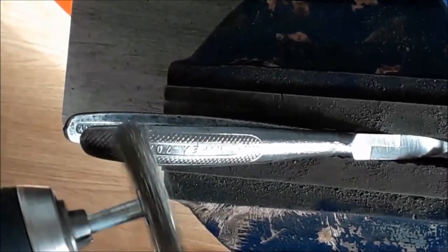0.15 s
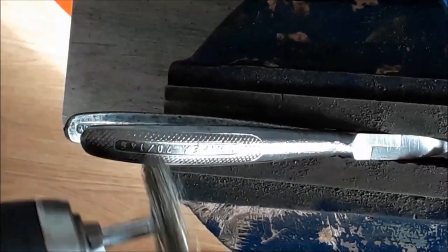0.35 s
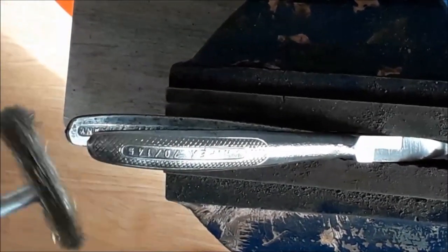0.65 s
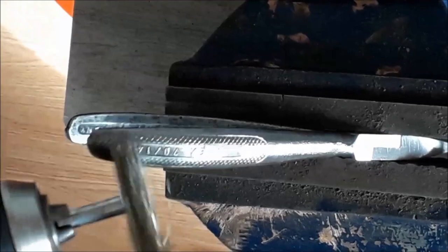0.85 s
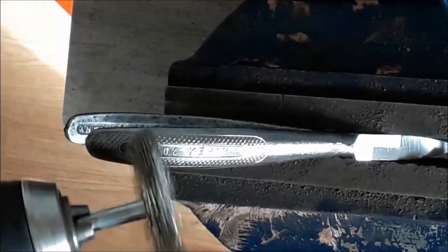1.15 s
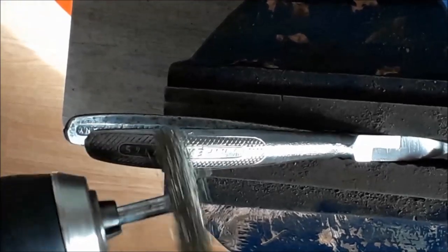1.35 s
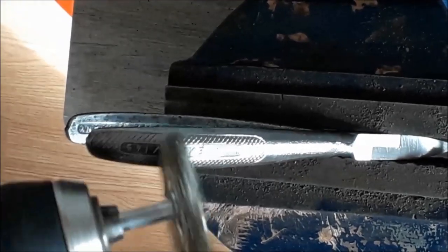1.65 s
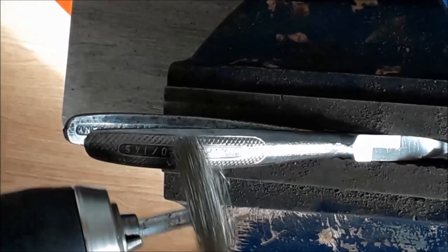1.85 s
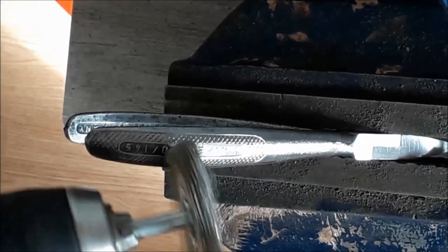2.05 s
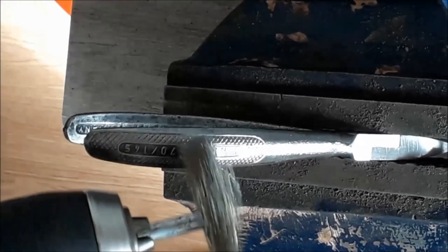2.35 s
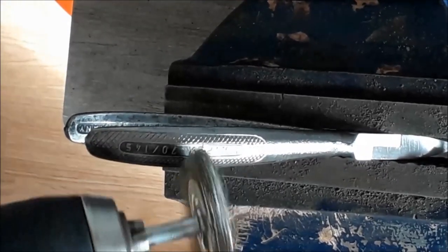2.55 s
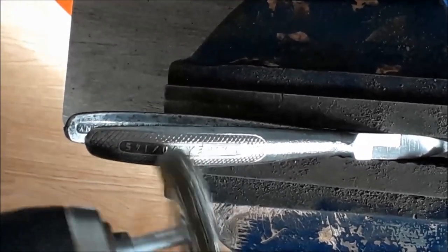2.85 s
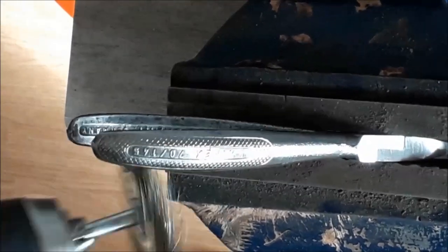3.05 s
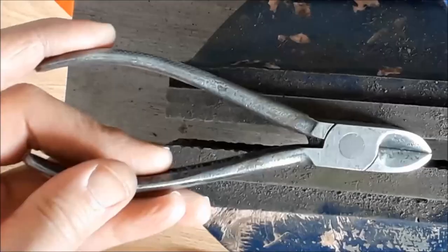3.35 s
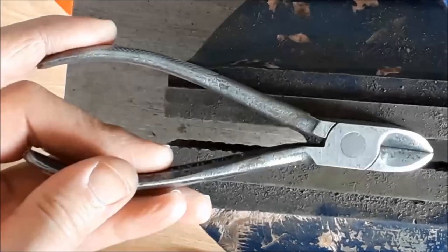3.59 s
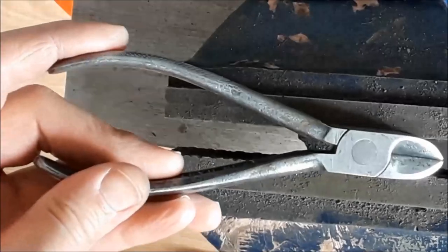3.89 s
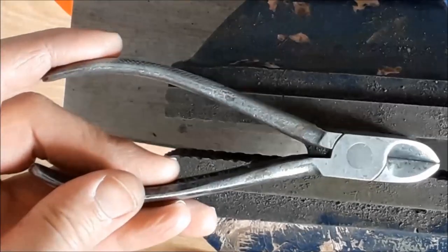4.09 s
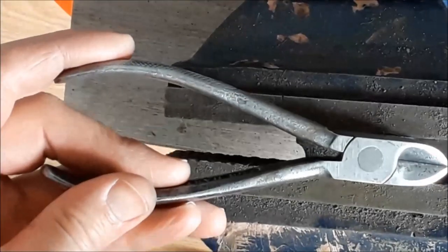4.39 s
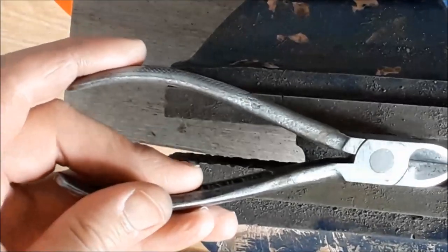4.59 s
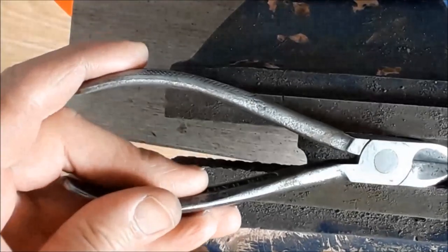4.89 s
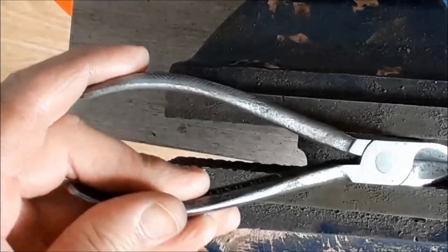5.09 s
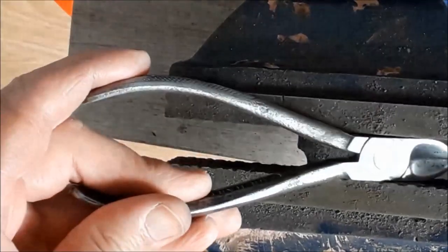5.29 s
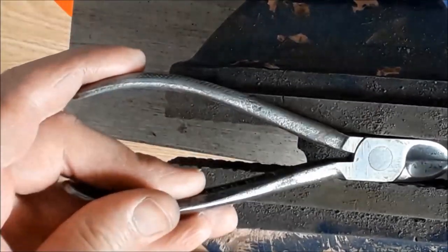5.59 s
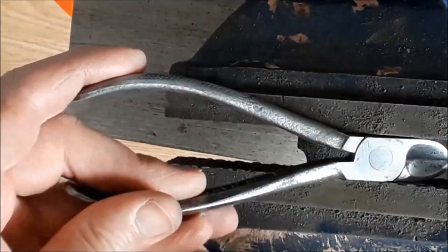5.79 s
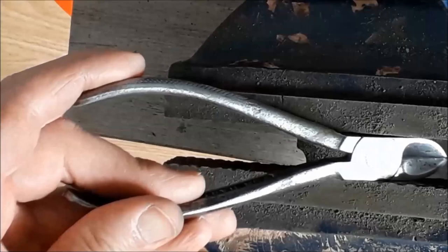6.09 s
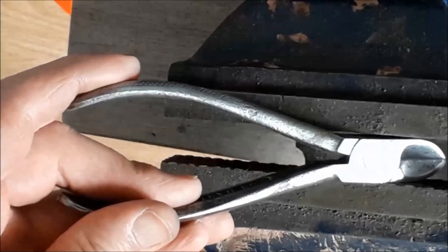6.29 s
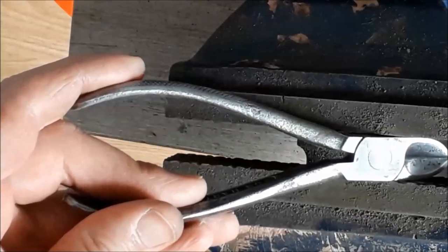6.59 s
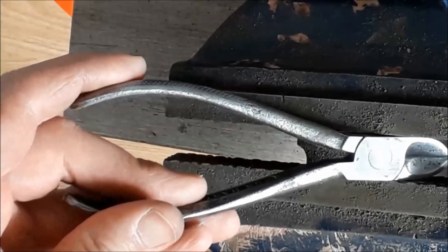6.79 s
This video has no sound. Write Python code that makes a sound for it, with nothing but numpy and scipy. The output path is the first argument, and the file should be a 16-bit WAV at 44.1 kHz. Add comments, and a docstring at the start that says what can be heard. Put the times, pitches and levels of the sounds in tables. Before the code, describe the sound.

Close drill whine and hissing wire bristles on steel stop abruptly, followed by wooden knocks and metal clacks across a workshop.

```python
"""A drill whines close to the microphone, spinning a wire wheel against pliers clamped in a workshop vice.
The motor sags once per turn of the lopsided wheel, its fan sings, and the bristles hiss and drum on the
handles. The drill's sound cuts off abruptly. Fingers then slide over the pliers and the joint ticks,
while wooden knocks, metal clacks and a heavy thud carry from across the room."""
import sys
import numpy as np
from scipy import signal
from scipy.fft import rfft, irfft, next_fast_len
from scipy.io import wavfile
from scipy.ndimage import map_coordinates

SR = 44100
rng = np.random.default_rng(int(sys.argv[2]) if len(sys.argv) > 2 else 0)


def inscribe(sig):
    """Save sig as 16-bit PCM at rate SR to the path in sys.argv[1].

    A 1-D sig is mono; a 2-D sig holds one channel per row.
    Samples are clipped to [-1, 1] before scaling.
    """
    pcm = np.round(np.clip(np.atleast_2d(sig).T, -1, 1) * 32767)
    wavfile.write(sys.argv[1], SR, pcm.astype(np.int16))


N = 306054

# Levels in the tables are relative.
# spectra of the room tone, the microphone's own hiss and skin on steel: f/Hz, level/dB
ROOM_TONE_SPECTRUM = [(25, -29), (60, -14.5), (130, -5.5), (200, -4.5), (500, -6.5), (800, -8.5),
                      (1200, -13.5), (1650, -11), (2500, -25), (4000, -32.5), (8000, -62.5)]
MIC_SPECTRUM = [(1000, -6.5), (4000, -12), (9500, -7.5), (11800, 2.5), (13500, -12.5), (15800, -8)]
SKIN_SPECTRUM = [(1180, -32), (2000, -6), (3060, -7), (4630, -6), (5690, -6), (9570, -8), (11900, -4.5),
                 (15800, -22.5)]
# the workshop's reverberation: f/Hz, t60/s
ROOM_DECAY = [(100, 0.35), (260, 0.15), (700, 0.29), (1800, 0.26), (5000, 0.24), (13000, 0.2)]
# fingers sliding on the pliers, close up: t/s, level/dB
FINGER_SLIDES = [(3.45, -51.5), (3.85, -57.5), (4.15, -53.5), (4.3, -55.5), (4.48, -68.5), (4.72, -62.5),
                 (5.25, -74.5), (5.6, -63), (5.9, -75), (6.17, -64.5), (6.45, -88.5), (6.65, -64.5),
                 (6.9, -87.5)]
# ticks of the pliers' joint: t/s, level/dB
JOINT_TICKS = [(3.87, -34), (4.73, -48)]
# ring of the joint: f/Hz, level/dB, t60/s
JOINT_MODES = [(6250, -2, 0.049), (11950, -12, 0.033), (14950, -14.5, .03)]
# metal clacks across the room: t/s, level/dB, added treble/dB
METAL_CLACKS = [(4.578, -54, 1), (5.253, -27, -2), (5.285, -26, -6), (5.309, -49, -14), (5.485, -40, 7.5),
                (5.504, -41.5, 13), (5.528, -24.5, 10.5)]
# knocks across the room: t/s, level/dB, boom/dB, crack/dB, lead of the first touch/s
WOOD_KNOCKS = [(3.561, -53.5, -3, 9, 0.0049), (3.724, -34.5, 17.5, -31, 0.012),
               (3.76, -30.5, 7.5, -17, 0.0087), (3.834, -32.5, 2, -10, 0.0054),
               (3.955, -15.5, -8.5, -20, 0.0079), (4.207, -48, -5, 6, 0.011), (4.352, -18, 4, 1.5, 0.0074),
               (4.662, -31, -17, -5.5, 0.01), (4.862, -39.5, 17.5, -11, 0), (5.699, -44.5, 3, -32, 0.0033),
               (5.951, -43, 2, -14, 0.0055), (6.243, -16, 0.5, -7.5, 0.012), (6.6, -35.5, 2, -29, 0.0093),
               (6.618, -30, -3, -34, 0.0014)]
# spectra of a clack, the thud and a knock: f/Hz, level/dB
CLACK_SPECTRUM = [(70, -31), (150, -5), (330, 2), (1000, -3), (2000, 0), (3200, -7), (6000, -6),
                  (9000, -13.5), (12000, -14.5), (13500, -26), (15800, -23)]
THUD_SPECTRUM = [(30, -25), (60, -31), (88, 1.5), (115, -6.5), (160, -1.5), (270, -6.5), (450, -1.5),
                 (750, -7.5), (1230, -5.5), (2060, -10.5), (3500, -13.5), (7000, -18.5), (11800, -29),
                 (15800, -42)]
KNOCK_SPECTRUM = [(53, -55), (90, -25), (145, -27), (218, 0.5), (400, -11.5), (497, -3.5), (566, -15.5),
                  (992, -12), (1230, -11.5), (1530, -9), (2110, -12), (4130, -27.5), (7100, -31),
                  (15800, -44)]
# resonances of struck metal, boards, wood and the clamped handles: f/Hz, width/Hz, level/dB
METAL_MODES = [(1017, 17, 3.5), (2210, 46, -14), (3180, 110, -5), (5000, 42, -10), (6060, 83, -11),
               (8240, 28, -6), (9000, 88, -5), (10700, 76, -15), (11700, 170, -9)]
BOARD_MODES = [(195, 140, 3.5), (437, 51, -12), (650, 23, 1), (810, 64, 4.5), (1310, 25, -11),
               (1560, 26, 1.5), (1900, 140, -7), (2310, 46, -3)]
WOOD_MODES = [(234, 210, -2), (490, 12, -3), (687, 64, 2.5), (1007, 18, 6.5), (1580, 84, 3),
              (2050, 110, -1.5), (3110, 110, -5.5)]
HANDLE_MODES = [(143, 42, -20.5), (213.8, 12, -2.5), (314, 36, -10.5), (347.7, 20, -18.5), (507, 10, -4),
                (545.8, 20, -6.5), (606.6, 16, -6.5), (855, 99, -21), (1020, 86, -12), (1104, 50, -16.5)]
# the fan's octave sings out as the pressure eases: t/s, half length/s, boost/dB
OCTAVE_SWELLS = [(0.475, 0.036, 9.5), (3.084, 0.095, 6), (3.365, 0.037, 10)]
# rush of bristles, fan and gears: f/Hz, level/dB
HISS_SPECTRUM = [(200, -36.5), (600, -16.5), (1400, -17.5), (2000, -6), (2600, -11.5), (3150, -1),
                 (4150, -8), (5300, 2.5), (6100, -2), (7200, 2), (9200, 0), (12150, 2.5), (12900, -4),
                 (15800, -5.5)]
# how hard the wheel bears on the handles, slipping off at 0.7 s and lifting at 3.2 s: t/s, drumming/dB
WHEEL_CONTACT = [(0, -30), (0.45, -29), (0.62, -33), (0.69, -54.5), (0.82, -59.5), (0.85, -33), (1.2, -29),
                 (1.33, -27.5), (1.8, -31), (2.9, -31.5), (3.08, -28.5), (3.21, -26), (3.28, -46.5),
                 (3.41, -57)]
# motor shaft speed before the wheel's drag: t/s, speed/Hz
MOTOR_SPEED = [(0, 455.3), (0.1, 453.9), (0.38, 452.5), (0.5, 457.1), (0.6, 460.7), (0.83, 460.2),
               (0.97, 454.4), (1.25, 455.2), (1.42, 453.4), (1.8, 454.0), (2.25, 453.4), (2.7, 454.7),
               (3.0, 456.7), (3.17, 460.8), (3.41, 460.6)]
# motor whine: shaft multiple (rounded when played), level under load/dB, level running free/dB
WHINE_HARMONICS = [(1, -51.5, -56), (3, -63, -48.5), (4, -43, -40), (5, -41, -57), (6, -38.5, -48),
                   (7, -40.5, -57.5), (9, -36.5, -51.5), (11, -40.5, -42), (15, -35, -31), (16, -43, -38),
                   (17, -38, -49.5), (18, -47.5, -35.5), (19.06, -23.5, -35.5), (22, -23.5, -32.5),
                   (23.1, -41.5, -30), (24, -37.5, -39), (25, -42, -35.5), (26, -24, -32), (27, -27, -37),
                   (28, -34.5, -39), (29, -31.5, -41.5), (30, -29.5, -31), (32, -35, -33.5),
                   (34, -46, -34.5)]

CUTOFF_S = 3.413  # the drill's sound cuts off
IDLE_HZ, LOADED_HZ = 461, 454  # shaft speed running free and under full load
WHEEL_RATIO, PINION_RATIO = 58.76, 5  # motor turns for one turn of each
FAN_BLADES = 10
THUD_S, SETTLE_S = 4.911, 0.009  # the heavy landing; gap between the touches ahead of it


def amp(db):
    """Decibels to gain."""
    return 10 ** (np.asarray(db) / 20)


def unit(x):
    """Scale to rms 1."""
    return x / np.sqrt(np.mean(x ** 2) + 1e-20)


def along(points, hz):
    """Interpolate (Hz, value) points on a log frequency axis."""
    f, values = np.transpose(points)
    return np.interp(np.log(hz + 1), np.log(f + 1), values)


def curve(points):
    """Interpolate (s, value) points to one value per sample."""
    return np.interp(np.arange(N) / SR, *np.transpose(points))


def wobble(rate):
    """A smooth random curve, rate knots a second."""
    knots = rng.standard_normal(int(N * rate / SR) + 4)
    coarse = np.arange(0, N, 16)
    return np.interp(np.arange(N), coarse, map_coordinates(knots, [coarse * rate / SR]))


def filtered(x, order, hz, kind):
    """x through a Butterworth filter."""
    return signal.sosfilt(signal.butter(order, hz, kind, fs=SR, output="sos"), x)


def coloured(x, gain):
    """x through the causal filter with this gain over frequency, keeping the power of white noise."""
    size = 8192
    magnitude = np.maximum(unit(gain(np.fft.rfftfreq(size, 1 / SR))), 1e-6)
    cepstrum = irfft(np.log(magnitude))[:size // 2]
    cepstrum[1:] *= 2  # minimum phase
    impulse = irfft(np.exp(rfft(cepstrum, size)))
    return signal.fftconvolve(x, impulse)[:len(x)]


def shaped(x, spectrum):
    """x coloured by (Hz, dB) points."""
    return coloured(x, lambda hz: amp(along(spectrum, hz)))


def resonances(modes, hz):
    """Gain of a body with (Hz, width, dB) modes."""
    return np.sqrt(sum(amp(db) ** 2 / (1 + (2 * (hz - f) / width) ** 2) for f, width, db in modes))


def struck_body(x, spectrum, modes, dead):
    """Contact noise x sounding through a body; dead weights the part that misses its resonances."""
    return coloured(x, lambda hz: amp(along(spectrum, hz)) * (dead + resonances(modes, hz)))


def add(track, s, x):
    """Mix x into track from time s."""
    part = track[round(s * SR):][:len(x)]
    part += x[:len(part)]


def background():
    """Microphone hiss, skin swishing over steel, and a low room tone that swells as the hand moves."""
    skin_db = curve(FINGER_SLIDES)
    murmur_db = -59.5 + 0.32 * (skin_db - skin_db[round(CUTOFF_S * SR):].mean())
    murmur = amp(murmur_db + 1.5 * wobble(14)) * shaped(rng.standard_normal(N), ROOM_TONE_SPECTRUM)
    skin = amp(skin_db + 1.4 * wobble(28)) * shaped(rng.standard_normal(N), SKIN_SPECTRUM)
    mic_hiss = amp(-71) * shaped(rng.standard_normal(N), MIC_SPECTRUM)
    return murmur + skin + mic_hiss


def joint_ticks():
    """Close up, the steel joint of the pliers clicks and rings briefly."""
    out, t = np.zeros(N), np.arange(SR // 8) / SR
    attack = 1 - np.exp(-t / 0.0011)
    ring = sum(amp(db - 60 * t / t60) * np.sin(2 * np.pi * hz * t) for hz, db, t60 in JOINT_MODES)
    for s, db in JOINT_TICKS:
        click = 0.61 * rng.standard_normal(len(t)) * amp(-60 * t / 0.066)
        add(out, s, amp(db) * (ring + click) * attack)
    return out


def blow(contact_t60, room_db, rise_s):
    """A burst of contact noise and the workshop's answer, which dies sooner in the treble."""
    t = np.arange(SR * 2 // 3) / SR
    hz, frame_s, noise = signal.stft(rng.standard_normal(len(t)), SR, nperseg=256)
    decay = amp(-60 * frame_s / along(ROOM_DECAY, hz)[:, None])
    tail = signal.istft(noise * decay, SR, nperseg=256)[1][:len(t)]
    contact = rng.standard_normal(len(t)) * amp(-60 * t / contact_t60) * (1 - np.exp(-t / rise_s))
    return contact + amp(room_db) * tail * (1 - np.exp(-t / 0.0013))


def clatter(contacts, contact_t60, room_db):
    """A run of (s, dB, added treble dB) blows on one object."""
    out = np.zeros(N)
    for s, db, treble_db in contacts:
        hit = blow(contact_t60, room_db, rise_s=0.0011)
        treble = filtered(hit, 1, 4000, "high")
        add(out, s, amp(db) * (hit + (amp(treble_db) - 1) * treble))
    return out


def clacks():
    """Across the room, metal meets twice in each clack, the second time a little harder."""
    chatter_s = 0.006
    contacts = [(s + k * chatter_s, db + k * 1.5, treble_db)
                for s, db, treble_db in METAL_CLACKS for k in (0, 1)]
    hits = clatter(contacts, contact_t60=0.041, room_db=-6.5)
    return struck_body(hits, CLACK_SPECTRUM, METAL_MODES, dead=0.52)


def thud():
    """Across the room a heavy thing lands on boards, corners first, then rattles softer and duller."""
    level_db, treble_db, bounce_s = -14, 6, 0.036
    landing = [(THUD_S - k * SETTLE_S, level_db - 3.5 * k, treble_db - 3.5 * k) for k in range(3)]
    rattle = [(THUD_S + k * bounce_s, level_db - 4 * k, treble_db - 2.3 * k) for k in range(1, 7)]
    hits = clatter(landing + rattle, contact_t60=0.046, room_db=-3.5)
    return struck_body(hits, THUD_SPECTRUM, BOARD_MODES, dead=0.49)


def board_thump(hz=99, t60=0.28):
    """The boards flex in a low, damped swing as the heavy thing's corners touch down."""
    out, t = np.zeros(N), np.arange(SR // 2) / SR
    envelope = amp(-17.5 - 60 * t / t60) * (1 - np.exp(-t / 0.0034))
    swing = envelope * np.sin(2 * np.pi * hz * t)
    add(out, THUD_S - SETTLE_S, filtered(swing, 3, 70, "high"))
    return out


def knocks(touch_db=-8):
    """Blows on wood across the room, each with a light first touch: heavy ones boom, hard ones crack."""
    out = np.zeros(N)
    for s, db, boom_db, crack_db, lead_s in WOOD_KNOCKS:
        for start, force_db in [(s - lead_s, touch_db), (s, 0)]:
            hit = blow(contact_t60=0.041, room_db=-12.5, rise_s=0.0018)
            wood = struck_body(hit, KNOCK_SPECTRUM, WOOD_MODES, dead=0.5)
            boom = amp(boom_db + 6) * filtered(wood, 2, 420, "low")
            middle = filtered(wood, 2, [420, 3800], "band")
            crack = amp(crack_db + force_db + 20) * filtered(wood, 2, 3800, "high")
            # the middle is inverted so the bands add in phase at the crossovers
            add(out, start, amp(db + force_db - 2.5) * (boom - middle + crack))
    return out


def gears(angle):
    """The same rough teeth come round with every turn of the pinion: a dense comb of faint lines."""
    teeth = rng.standard_normal(round(PINION_RATIO * SR / IDLE_HZ))
    place = angle / (2 * np.pi * PINION_RATIO) % 1 * len(teeth)
    return unit(map_coordinates(teeth, [place], mode="grid-wrap"))


def fan(angle, load, wheel):
    """The cooling fan sings at its blade rate, louder under load, and an octave up; gears make it rasp."""
    t = np.arange(N) / SR
    tone_db = -32 + 13.5 * load ** 0.96 + 0.37 * load * wheel
    flicker_db = 5.3 * (1 - load) * wobble(35) + 0.9 * wobble(30)
    rasp = 1 + 0.19 * np.sin(2 / PINION_RATIO * angle) + 0.2 * wobble(250)
    tone = amp(tone_db + flicker_db) * rasp * np.sin(FAN_BLADES * angle)
    swell_db = sum(db * np.exp(-((t - s) / half_s) ** 2) for s, half_s, db in OCTAVE_SWELLS)
    octave_db = -24 + load * (-3 + 3 * wobble(25)) + swell_db + 1.5 * wobble(12) + 1.2 * wobble(25)
    octave = amp(octave_db) * np.sin(2 * FAN_BLADES * angle)
    sideband = amp(-34.5 + 4 * wobble(18)) * np.sin((FAN_BLADES + 2 / PINION_RATIO) * angle)
    return tone + octave + sideband


def bristles(rate, spread_db):
    """Wire tips flick the steel at random, rate times a second; spread_db varies their force."""
    hits = rng.random(N) < rate / SR
    return unit(hits * rng.choice([-1, 1], N) * amp(spread_db * rng.standard_normal(N)))


def hiss(speed, angle):
    """Wire tips, air and gear teeth in one bright rush."""
    rush = bristles(rate=12000, spread_db=0) + rng.standard_normal(N) + 0.7 * gears(angle)
    # part of it comes round again one shaft turn later, so it gathers about the harmonics
    turn_ago = np.clip(np.arange(N) - SR / speed, 0, None)
    rush = unit(rush + 0.22 * map_coordinates(rush, [turn_ago]))
    return amp(1.1 * wobble(45)) * shaped(rush, HISS_SPECTRUM)


def drumming(load, hum_hz=215):
    """Tufts of wire beat on the handles and their steady push keeps them humming; a light touch is thin."""
    taps = filtered(bristles(rate=2500, spread_db=3.5), 3, 115, "high")
    ring = coloured(taps, lambda hz: resonances(HANDLE_MODES, hz) / (1 + (hz / 1800) ** 2))
    hum = np.sqrt(2) * np.sin(2 * np.pi * hum_hz * np.arange(N) / SR + 1.1 * wobble(18))
    full = unit(ring + load * amp(-5.5 + 1.5 * wobble(28)) * hum)
    thin = filtered(full, 1, 380, "high")
    return amp(1.6 * wobble(25)) * (load * full + (1 - load) * 1.1 * thin)


def motor(angle, load, wheel_turns):
    """Shaft harmonics; the high ones fray most and throb, each at its own point in the wheel's turn."""
    out = np.zeros(N)
    for multiple, loaded_db, free_db in WHINE_HARMONICS:
        high = np.clip((multiple - 12) / 12, 0, 1)
        throb_db = 6.5 * load * high * (np.cos(2 * np.pi * (wheel_turns + rng.random())) - 0.5)
        level_db = free_db + load * (loaded_db - free_db) + throb_db + 2.5 * wobble(28)
        jitter = 0.1 * (1 + high) * wobble(120)
        out += amp(level_db) * np.sin(round(multiple) * angle + jitter + rng.uniform(0, 2 * np.pi))
    return out


def drill(first_drag_s=0.094, drag_hz=2.0):
    """At the microphone: pressing the wheel on the steel slows the motor and makes the bristles drum."""
    t = np.arange(N) / SR
    speed, drum_db = curve(MOTOR_SPEED), curve(WHEEL_CONTACT)
    load = np.clip((IDLE_HZ - speed) / (IDLE_HZ - LOADED_HZ), 0, 1)
    # the lopsided wheel drags the speed down once a turn, by drag_hz at full load
    wheel_turns = np.cumsum(speed) / SR / WHEEL_RATIO
    wheel = -np.cos(2 * np.pi * (wheel_turns - wheel_turns[round(first_drag_s * SR)]))
    speed = speed + drag_hz * load * wheel + 0.25 * wobble(40)
    angle = 2 * np.pi * np.cumsum(speed) / SR
    whine = amp(0.2) * motor(angle, load, wheel_turns)
    hiss_db = -17.5 + 0.05 * (drum_db - np.median(drum_db)) + 0.33 * wobble(12)
    rush = amp(hiss_db) * hiss(speed, angle)
    drum = amp(drum_db - 0.4 * wheel + 0.7 * wobble(12)) * drumming(load)
    gate = np.where(t < CUTOFF_S, 1, amp(-21 - 60 * np.abs(t - CUTOFF_S) / 0.07))
    return (whine + fan(angle, load, wheel) + rush + drum) * gate


def scene():
    """One microphone by the vice, on both channels: drill and pliers close, the rest across the room."""
    mono = thud() + clacks() + drill() + knocks() + board_thump() + joint_ticks() + background()
    return np.array([mono, mono])


def record(dry, top_hz=15900):
    """The sound fades out steeply at the band limit, top_hz."""
    size = next_fast_len(N + SR // 2)
    passband = np.clip((top_hz - np.fft.rfftfreq(size, 1 / SR)) / 200, 0, 1) ** 2
    return irfft(rfft(dry, size) * passband, size)[:, :N]


dry = scene()
out = record(dry)
inscribe(out)
```